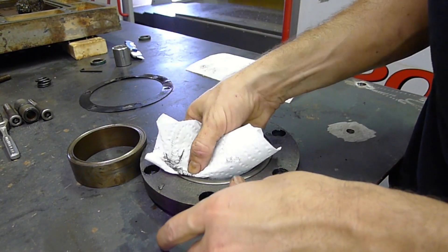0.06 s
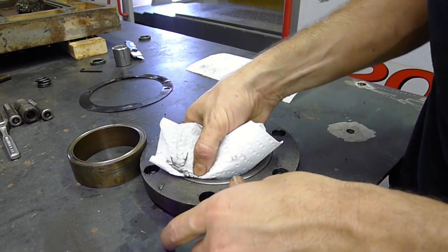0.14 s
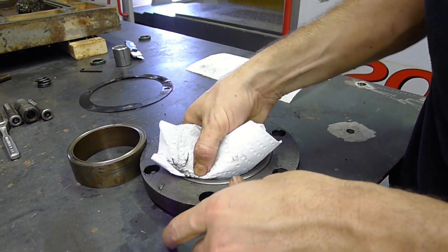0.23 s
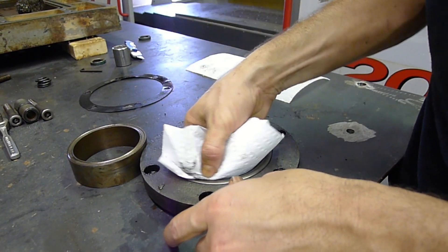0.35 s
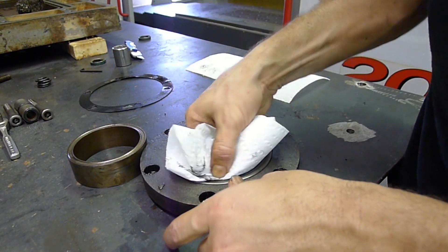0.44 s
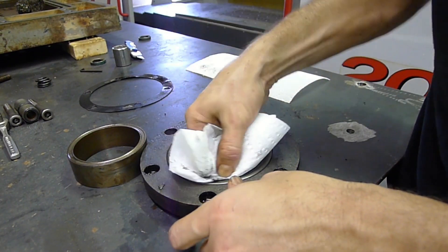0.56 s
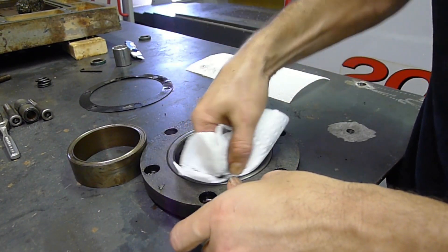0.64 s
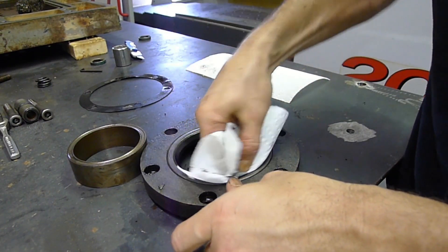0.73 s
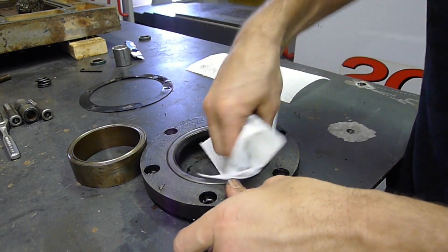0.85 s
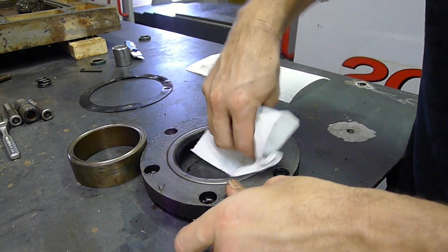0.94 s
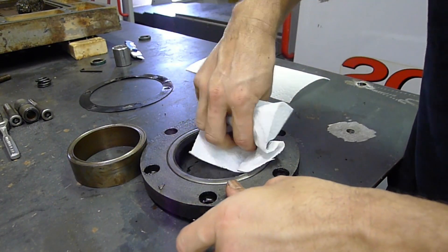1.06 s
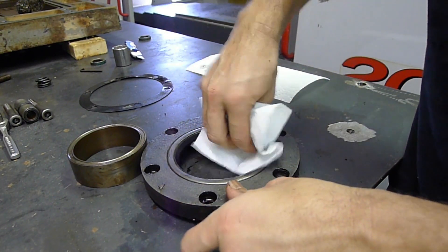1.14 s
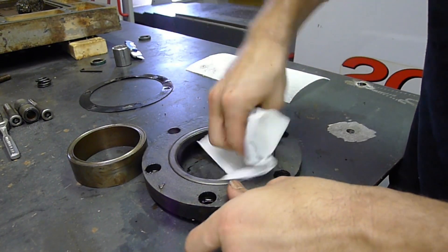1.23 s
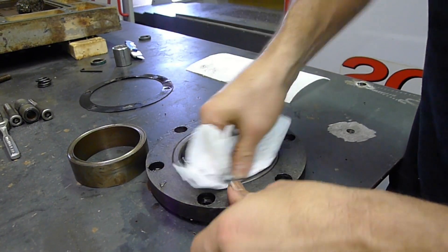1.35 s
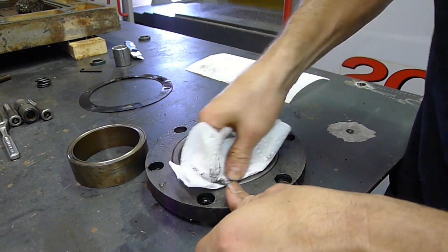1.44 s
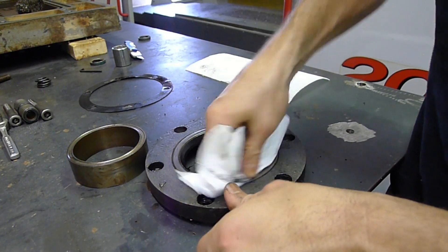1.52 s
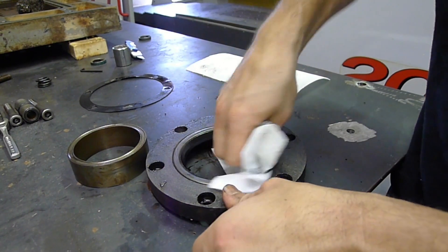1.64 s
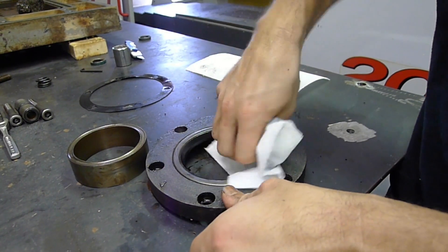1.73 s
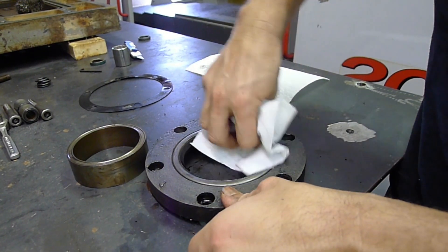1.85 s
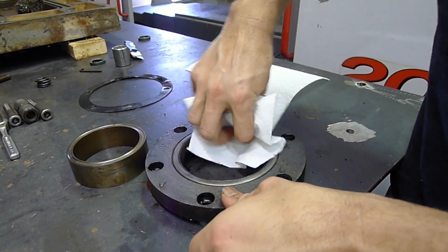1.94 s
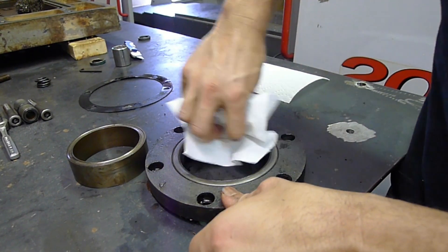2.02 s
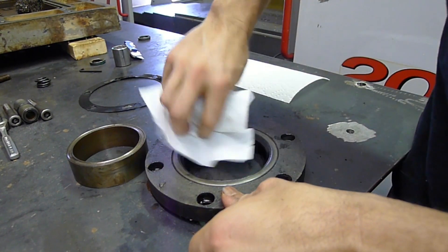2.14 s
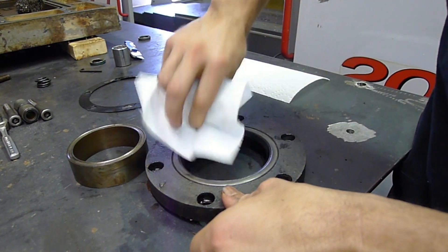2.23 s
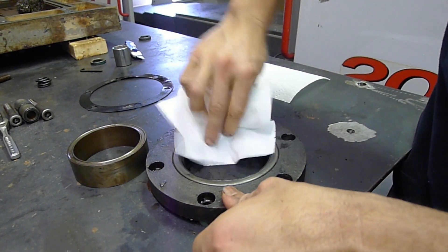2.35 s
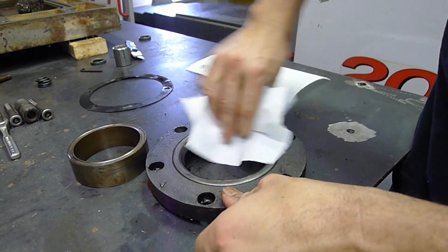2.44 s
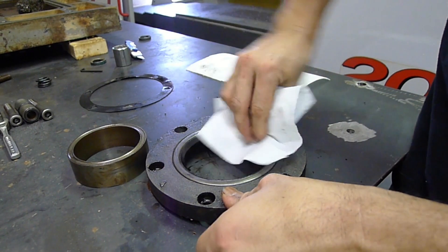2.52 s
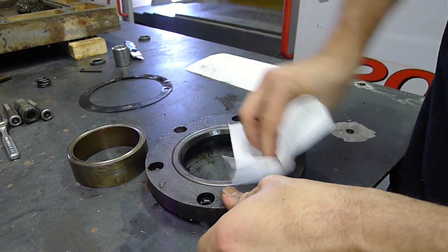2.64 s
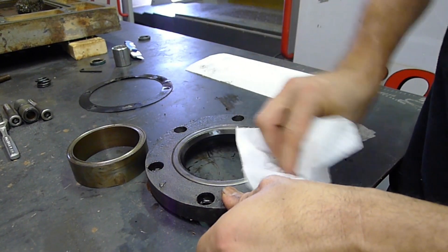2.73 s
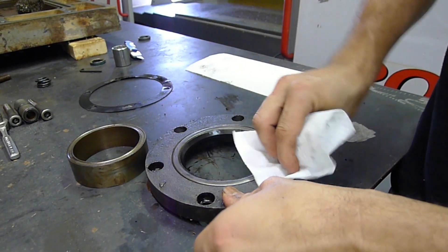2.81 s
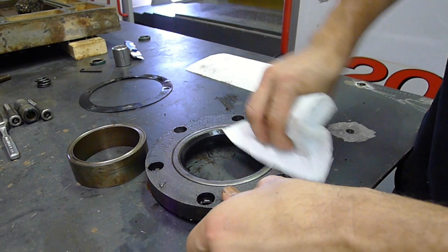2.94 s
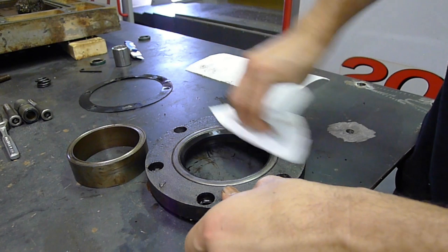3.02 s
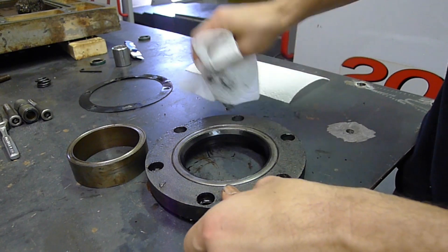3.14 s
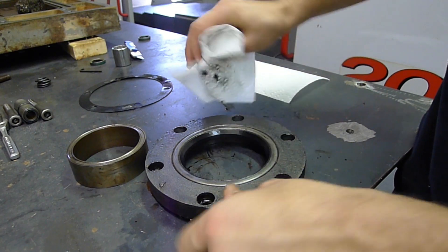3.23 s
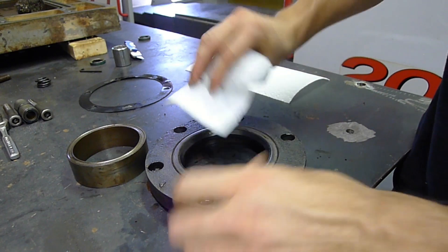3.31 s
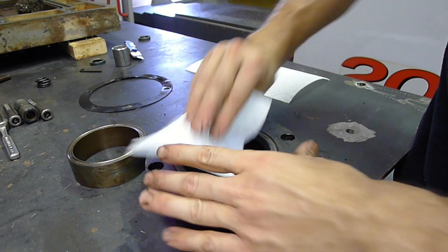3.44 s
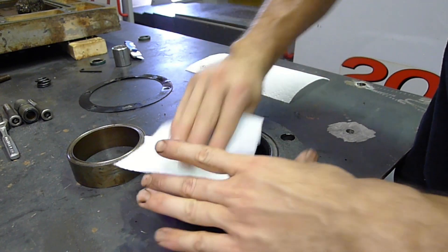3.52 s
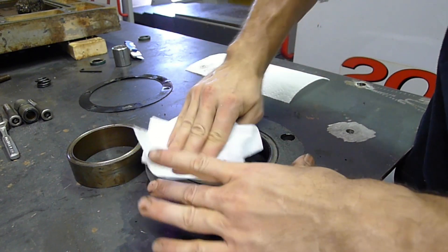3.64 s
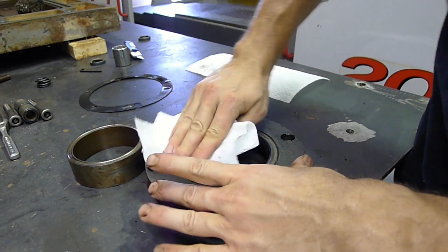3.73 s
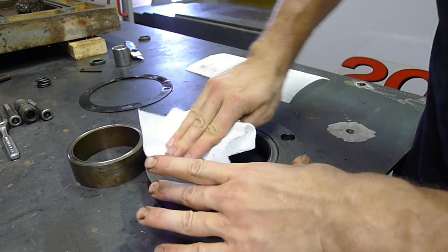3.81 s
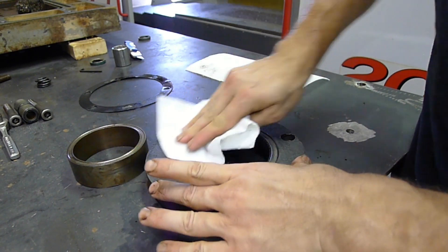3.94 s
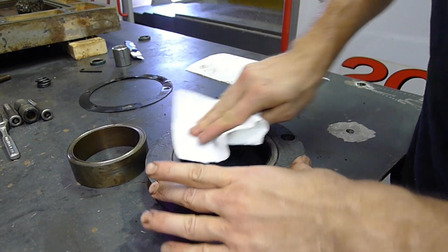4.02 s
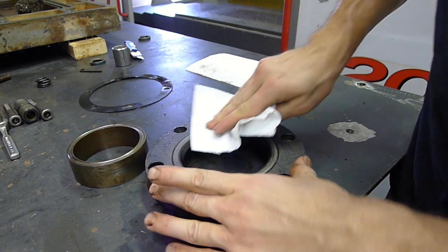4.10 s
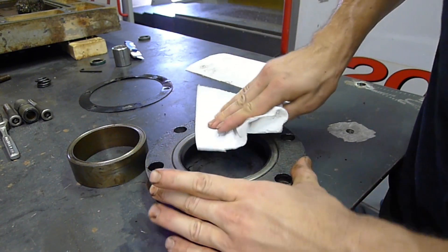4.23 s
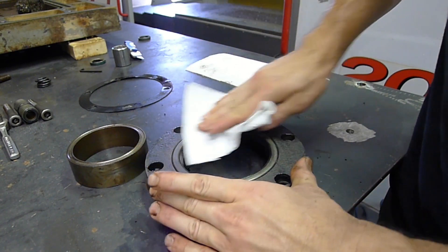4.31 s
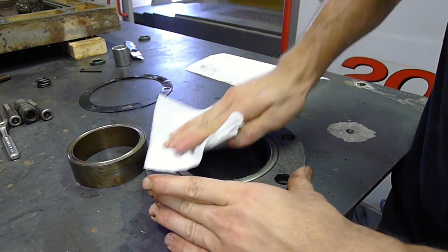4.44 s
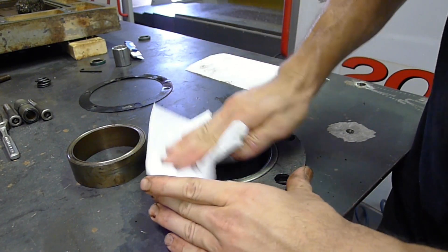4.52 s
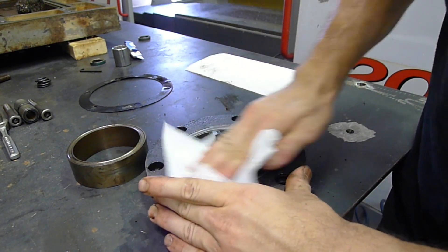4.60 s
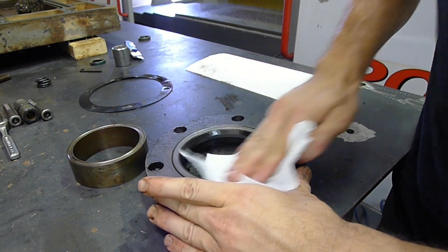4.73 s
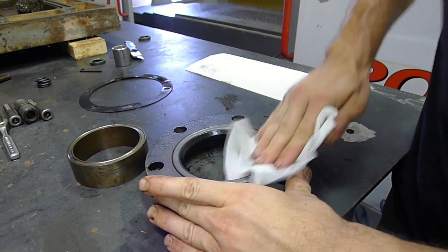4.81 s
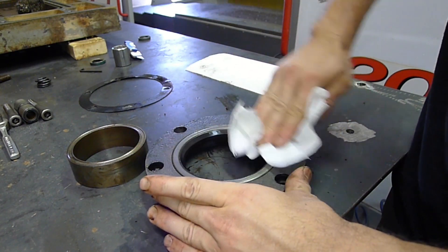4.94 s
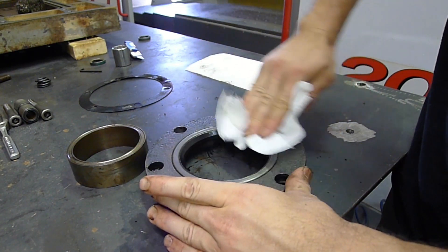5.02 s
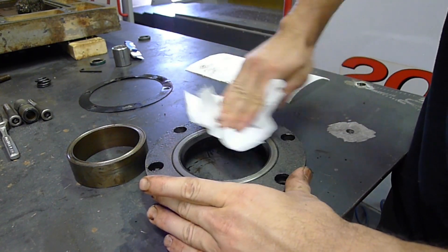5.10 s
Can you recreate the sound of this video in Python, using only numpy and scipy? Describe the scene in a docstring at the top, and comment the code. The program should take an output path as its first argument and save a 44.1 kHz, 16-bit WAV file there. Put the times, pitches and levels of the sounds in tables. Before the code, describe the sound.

Close, dry wiping of a paper towel on a steel ring, over a steady low-level workshop hiss with faint mains hum and rumble. From 0 to 0.5 s the rubs are soft and rustling; a small hard knock lands at 0.5 s, then longer swishes swell near 0.95 and 1.2 s. At about 1.26 s the flange skids, a very short rough metallic grind from the bench, followed by a dull thud at 1.35. Moderate strokes run to 2.17, then a near-pause with light papery ticks and taps until 2.36. The strongest, brightest strokes come at 2.45-2.75 and 2.8-3.08 s, with crisp snaps and a knock at 2.7. Wiping fades to a brief gap near 3.4; small taps follow. From 3.6 s smoother rubs rise and fall, dipping at 4.18, becoming fuller and hollow-toned after 4.6, with faint snaps, and still rubbing at the end, just past 5 s.

```python
"""Paper towel wiping a steel flange

A paper towel wipes a steel flange on a steel workbench, close to the microphone, in a quiet humming workshop.
Fibres catch and slip on the metal: clumped noise, coloured by the sheet, the ring and the hollow of the bore.
Folds knock on the rim and snap, the sheet ticks and the hand pushes the bench: short damped swings with noise.
Once the flange skids, and rough noise drives the modes of the bench top."""
import sys
import numpy as np
from scipy import signal
from scipy.fft import rfft, irfft, next_fast_len
from scipy.io import wavfile
from scipy.ndimage import uniform_filter1d, map_coordinates

SR = 44100
rng = np.random.default_rng(int(sys.argv[2]) if len(sys.argv) > 2 else 0)


def wrap_up_sound(samples):
    """Save the sound to the file named by the first command line argument, as 16-bit audio."""
    columns = np.atleast_2d(samples).T
    # keep every value between -1 and 1, then stretch to whole-number steps
    tamed = np.clip(columns, -1, 1)
    steps = np.round(tamed * 32767).astype(np.int16)
    wavfile.write(sys.argv[1], SR, steps)


N = 227850  # samples
HOP = 128  # samples between spectral frames

# Spectrum of the room noise. Each row: frequency in Hz, relative density in dB per Hz.
ROOM_SPECTRUM = [(24, -30), (45, -25), (461, -4), (722, -6), (1020, -7.5), (1280, -5), (2510, -8),
                 (2920, -16.5), (4800, -13.5), (15500, -26)]
# Partials of the mains hum. Each row: frequency in Hz, peak level in dB before wavering.
HUM_PARTIALS = [(119, -66), (238, -62.5)]
# Modes of the bench top. Each row: frequency in Hz, width in Hz, relative level in dB.
BENCH_MODES = [(277, 17, -2), (415.6, 12, 4.5), (467, 22, 2), (533, 11, -3), (670, 26, -7), (712, 15, 6),
               (810, 27, -14), (941, 12, 2.5), (1008, 12, -6), (1200, 25, -29), (1220, 9.4, -2)]
# The hand pushing the bench. Each row: start in seconds, level in dB before the swing and puff gains,
# pitch in Hz, time to decay by 60 dB in seconds.
BENCH_PUSHES = [(1.349, -42.5, 290, 0.26), (1.47, -53, 310, 0.072), (3.258, -43, 201, 0.095),
                (4.971, -47, 183, 0.1), (5.091, -33, 252, 0.034)]
# Folds knocking on the rim. Each row: start, level, pitch and decay time, as for the pushes.
RIM_KNOCKS = [(0.5068, -13.5, 930, 0.0069), (0.5094, -33, 1110, 0.012), (0.5072, -27, 480, 0.019),
              (2.192, -36.5, 513, 0.031), (2.346, -29, 1080, .015), (2.359, -29.5, 865, 0.02),
              (2.364, -29, 500, 0.0082), (2.7073, -11.5, 870, 0.004), (3.034, -28.5, 1200, 0.016),
              (3.054, -19.5, 580, 0.013), (3.278, -26.5, 509, 0.011), (3.457, -33, 1420, 0.019),
              (3.552, -29, 1080, 0.014), (3.563, -30, 795, 0.011)]
# The sheet ticking as it lifts or lands. Each row: start, level, pitch and decay time, as for the pushes.
SHEET_TICKS = [(0.0194, -31, 8000, .012), (0.5067, -43, 7000, 0.016), (2.1925, -22, 4200, 0.039),
               (2.2564, -33, 7000, .02), (2.347, -28, 7000, .015), (2.7685, -28, 4000, .014),
               (2.7774, -33, 6000, .014), (3.6147, -38, 7000, .012)]
# Folds snapping. Each row: start in seconds, level in dB before the swing and puff gains, pitch in Hz.
FOLD_SNAPS = [(0.507, -32, 2650), (0.6394, -33.5, 4040), (2.5642, -25.5, 4670), (2.6195, -21, 2460),
              (2.6384, -25, 4000), (2.6844, -24, 4440), (2.9405, -31, 4300), (2.9527, -18.5, 3260),
              (3.457, -35, 2670), (3.559, -26.5, 1940), (4.795, -29, 2800), (4.809, -26, 2710),
              (4.9255, -23.5, 3180)]
# Spectrum of paper fibres on steel. Each row: frequency in Hz, relative density in dB per Hz.
FIBRE_SPECTRUM = [(880, -15), (1500, -17), (2470, -7.5), (2920, -25), (3180, -11.5), (3760, -3), (6750, -3),
                  (7520, -3), (8460, -4), (15500, -12.5)]
# Modes of the rubbed ring. Each row: frequency in Hz, width in Hz, lift in dB at a ringing share of 1.
FLANGE_MODES = [(1970, 280, 3.5), (3270, 310, 3), (4270, 140, 2.5)]
# Pressure of the hand, one list per stroke. Each row: time in seconds, level of the swish in dB
# before the ring and the creases.
STROKE_PRESSURE = [
    [(0.0, -55), (0.006, -46.5), (0.138, -50.5), (0.152, -59), (0.202, -61), (0.212, -47), (0.218, -58),
     (0.26, -51.5)],
    [(0.26, -61), (0.266, -52), (0.292, -47.5), (0.328, -49), (0.418, -47), (0.466, -52), (0.47, -60),
     (0.5, -56)],
    [(0.51, -43), (0.562, -49), (0.618, -44.5), (0.698, -48), (0.94, -38), (1.05, -46), (1.074, -61),
     (1.09, -70)],
    [(1.09, -56), (1.106, -50.5), (1.134, -56), (1.15, -42.5), (1.18, -35), (1.298, -38), (1.384, -46),
     (1.43, -57)],
    [(1.43, -64), (1.432, -54), (1.47, -46), (1.512, -47.5), (1.58, -41.5), (1.718, -42.5), (1.782, -41),
     (1.95, -45.5)],
    [(1.95, -45), (2.028, -40), (2.098, -43), (2.172, -51.5), (2.18, -49)],
    [(2.21, -64), (2.248, -64), (2.256, -49), (2.266, -75), (2.31, -70), (2.32, -47.5), (2.335, -65)],
    [(2.34, -51), (2.354, -44), (2.418, -45), (2.458, -38.5), (2.644, -29.5), (2.702, -31), (2.742, -40),
     (2.77, -48)],
    [(2.77, -38), (2.79, -46.5), (2.844, -35.5), (2.912, -30), (3.034, -29.5), (3.068, -33), (3.094, -44.5),
     (3.11, -41)],
    [(3.11, -45), (3.132, -46.5), (3.146, -40.5), (3.174, -46.5), (3.186, -43.5), (3.32, -52.5),
     (3.328, -53), (3.39, -73)],
    [(3.39, -64), (3.414, -56), (3.418, -53.5), (3.472, -42.5), (3.508, -51.5), (3.558, -43), (3.585, -50)],
    [(3.585, -52), (3.619, -40), (3.815, -42.5), (3.971, -36.5), (4.123, -42.5), (4.159, -45.5),
     (4.169, -51), (4.19, -59)],
    [(4.19, -64), (4.21, -56), (4.216, -50), (4.262, -50), (4.288, -43), (4.372, -37), (4.536, -37),
     (4.57, -42.5)],
    [(4.57, -42), (4.582, -39), (4.688, -38.5), (4.814, -34), (4.852, -36), (5.13, -38), (5.166, -35)],
]
# How the towel cups the bore. Each row: time in seconds, hollow level in dB at usual pressure,
# hollow pitch in Hz, treble in dB over the swish at usual pressure.
BORE_CUPPING = [(0.05, -24, 990, -2), (0.35, -23, 1076, 0.5), (0.6, -24, 1030, -7), (0.8, -29.5, 1150, 1),
                (0.93, -38.5, 990, -2), (1.05, -29, 990, 5), (1.18, -28, 1000, -4.5), (1.31, -18, 960, -4),
                (1.45, -25.5, 1000, 5.5), (1.65, -31.5, 950, -0.5), (1.8, -35, 970, 2.5),
                (2.04, -27.5, 1050, -2), (2.15, -42.5, 1100, 5), (2.28, -26, 1020, 4),
                (2.36, -27.5, 980, 0), (2.48, -29.5, 1070, -4.5), (2.6, -34, 1180, -9),
                (2.72, -35.5, 1080, -16), (2.9, -32.5, 970, -9.5), (3.05, -28, 990, -5.5),
                (3.25, -31.5, 940, -2), (3.39, -26.5, 1070, 8), (3.47, -26, 1080, -3),
                (3.56, -27.5, 1040, -4), (3.65, -29, 920, 1), (3.98, -31.5, 1030, -4),
                (4.35, -34, 1030, 0.5), (4.44, -32, 990, -4), (4.56, -29, 900, -2), (4.66, -27, 1210, -4),
                (4.76, -21, 1180, -4.5), (4.9, -27, 1160, -5), (4.98, -24.5, 900, -2),
                (5.09, -28, 980, -4.5), (5.16, -35.5, 1020, -5)]
# How freely flange and hollow ring. Each row: time in seconds, share of the flange's mode lift,
# width of the hollow's resonance in Hz at usual pressure.
RINGING_FREEDOM = [(0, 1.8, 420), (.65, 1.1, 380), (.87, 1.3, 432), (1.05, 0.61, 500), (1.3, 1.6, 694),
                   (1.6, 0.6, 480), (2.1, 0.88, 620), (2.6, 0.57, 554), (4.0, 0.54, 513), (4.5, .7, 300),
                   (4.75, 0.44, 650), (5.16, .6, 580)]
# How the fingers hold the sheet. Each row: time in seconds, fold level in dB and finger pad level in dB
# (both at usual pressure and cupping), fold pitch in Hz.
FINGER_GRIP = [(0, -32.5, -40, 2740), (.45, -34, -37.5, 2530), (.8, -32.5, -36, 2930),
               (.98, -35, -36, 2800), (1.065, -26.5, -36, 2700), (1.1, -34.5, -29, 2600),
               (1.18, -31, -41, 2770), (1.35, -33, -28, 2400), (1.65, -32, -45, 3040),
               (1.95, -34.5, -47, 2900), (2.15, -33, -23, 2870), (2.28, -30.5, -29, 2600),
               (2.36, -29, -27, 2450), (2.48, -31, -45, 3070), (2.7, -29, -28.5, 2380),
               (2.9, -29, -33, 2800), (3.06, -34, -33.5, 2900), (3.25, -30, -29.5, 2880),
               (3.52, -33, -32, 2450), (3.66, -33.5, -34.5, 2620), (3.98, -34.5, -31.5, 2500),
               (4.35, -33.5, -28, 2930), (4.5, -35, -36.5, 2440), (4.63, -33, -43, 2120),
               (4.74, -33.5, -41, 2600), (4.81, -28.5, -38, 2840), (4.9, -31, -38.5, 2900),
               (5.16, -32.5, -30.5, 2700)]
# Narrow dip of the microphone path, as one row: centre in Hz, width in Hz.
MICROPHONE_DIP = (7460, 510)

ROOM_DB, ROOM_WAVER_DB = -50, 0.6  # rms level and its waver
HUM_WAVER_DB = 2.5
RUMBLE_DB, RUMBLE_WAVER_DB = -64, 3
SKID_S, SKID_DB = 1.263, -35  # the flange drags on the bench: centre of the loudest moment
SKID_HOLD_S, SKID_RISE_DB_PER_S, SKID_FALL_DB_PER_S = 0.066, 282, 220
SKID_TAIL_DB, SKID_TAIL_DB_PER_S = -41, 56  # it grinds on faintly before it stops
SNAP_T60_S = 0.011
USUAL_SWISH_DB, USUAL_CUP_DB = -40, -30
BODY_FOLLOWS = 0.54  # dB of hollow, fold and pad per dB of pressure
TREBLE_FOLLOWS = 0.45  # extra dB of treble per dB of pressure
FOLD_CUPS, PAD_CUPS = 0.18, 0.89  # dB of fold and of pad per dB of cupping
WIDENS = 0.07  # the hollow's resonance grows this many dB wider per dB of pressure
BASS_CORNER_HZ, TOP_HZ = 153, 15730


def amp(db):
    """The decibel law: 20 dB is a factor of ten in amplitude."""
    return 10 ** (np.asarray(db) / 20)


def unit(x):
    """Normalisation to a root mean square of 1."""
    return x / np.sqrt(np.mean(np.abs(x) ** 2) + 1e-20)


def along(points, hz):
    """Interpolation of (Hz, value) points on a logarithmic frequency axis."""
    f, v = np.transpose(points)
    return np.interp(np.log(hz + 1), np.log(f + 1), v)


def curves(rows, t):
    """Linear interpolation at times t of each column after the time."""
    s, *cols = np.transpose(rows)
    return [np.interp(t, s, c) for c in cols]


def wobble(rate):
    """Band-limited random motion: a smooth curve through `rate` random knots a second."""
    knots = rng.standard_normal(int(N * rate / SR) + 4)
    return map_coordinates(knots, [np.arange(N) * rate / SR])


def filtered(x, response):
    """Linear filtering: the spectrum of x times a complex response of frequency."""
    m = next_fast_len(N + SR // 2)
    hz = np.fft.rfftfreq(m, 1 / SR)
    return irfft(rfft(x, m) * response(hz), m)[..., :N]


def resonance(hz, centre_hz, width_hz):
    """Damped oscillator: the response of one mode, with gain 1 at its centre."""
    damping = 1j * hz * width_hz
    return damping / (centre_hz ** 2 - hz ** 2 + damping + 1e-9)


def slips(clump_db, spike_db):
    """Stick-slip friction: dense noise whose size comes in clumps, with a few larger catches."""
    clumps = clump_db * (wobble(60) + wobble(400))
    catches = spike_db * rng.exponential(size=N)
    return unit(amp(clumps + catches) * rng.standard_normal(N))


def taps(rows, swing, puff):
    """Impulsive excitation: each tap is a short damped swing with a puff of noise of like colour."""
    out = np.zeros(N + SR)
    t = np.arange(SR // 5) / SR
    for s, db, hz, t60 in rows:
        b, a = signal.butter(1, [0.5 * hz, 1.8 * hz], "band", fs=SR)
        noise = unit(signal.lfilter(b, a, rng.standard_normal(len(t))))
        onset = 1 - np.exp(-t * hz * 0.71)
        shape = amp(db - 60 * t / max(t60, 0.002)) * onset
        out[round(s * SR):][:len(t)] += shape * (puff * noise - swing * np.sin(2 * np.pi * hz * t))
    return out[:N]


def workshop():
    """Stationary ambience: shaped room noise, a wavering mains hum and a low rumble that comes and goes."""
    t = np.arange(N) / SR
    air = unit(filtered(rng.standard_normal(N), lambda hz: amp(along(ROOM_SPECTRUM, hz))))
    air = amp(ROOM_DB + ROOM_WAVER_DB * wobble(3.23)) * air
    hum = np.zeros(N)
    for hz, db in HUM_PARTIALS:
        phase = 2 * np.pi * hz * t + 0.46 * wobble(3.98)
        hum += amp(db + 0.62 * wobble(3.9)) * np.sin(phase)
    hum = amp(HUM_WAVER_DB * wobble(3.7)) * hum
    rumble = unit(filtered(rng.standard_normal(N), lambda hz: resonance(hz, 189, 106) ** 2))
    rumble = amp(RUMBLE_DB + RUMBLE_WAVER_DB * wobble(4.06)) * rumble
    return air + hum + rumble


def bench_pushes():
    """Low damped vibration: the hand pushes the bench, which gives dull thuds."""
    return taps(BENCH_PUSHES, swing=1.86, puff=0.68)


def bench_response(hz):
    """Modal superposition: the resonances of the bench top add with alternating sign."""
    return sum((-1) ** k * amp(db) * resonance(hz, centre, width)
               for k, (centre, width, db) in enumerate(BENCH_MODES))


def skid():
    """Friction-driven vibration: rough steel on steel drives the modes of the bench top."""
    t = np.arange(N) / SR - SKID_S
    before = np.maximum(-t - SKID_HOLD_S / 2, 0)
    after = np.maximum(t - SKID_HOLD_S / 2, 0)
    main = amp(SKID_DB - SKID_FALL_DB_PER_S * after)
    tail = amp(SKID_TAIL_DB - SKID_TAIL_DB_PER_S * after)
    rise = amp(-SKID_RISE_DB_PER_S * before)
    grind = unit(filtered(slips(clump_db=2.0, spike_db=3.0), bench_response))
    return (main + tail) * rise * grind


def fold_taps():
    """Brief impacts of paper: folds knock and snap mostly as tones, the lifting sheet ticks mostly as noise."""
    knocks = taps(RIM_KNOCKS, swing=2.27, puff=0.16)
    snaps = taps([(*row, SNAP_T60_S) for row in FOLD_SNAPS], swing=1.42, puff=0.45)
    ticks = taps(SHEET_TICKS, swing=0.1, puff=0.23)
    return knocks + snaps + ticks


def towel():
    """Source and filter: fibre slips coloured moment by moment by the crumpled sheet, ring and hollow."""
    friction = slips(clump_db=0.37, spike_db=1.0)
    hz, t, z = signal.stft(friction, SR, nperseg=4 * HOP, noverlap=3 * HOP)
    f = hz[:, None]
    swish_db, = curves(np.vstack(STROKE_PRESSURE), t)
    cup_db, hollow_hz, treble_db = curves(BORE_CUPPING, t)
    fold_db, pad_db, fold_hz = curves(FINGER_GRIP, t)
    freedom, width_hz = curves(RINGING_FREEDOM, t)

    press = swish_db - USUAL_SWISH_DB
    cup = cup_db - USUAL_CUP_DB
    body_db = BODY_FOLLOWS * press
    width_hz = width_hz * amp(WIDENS * press)

    # harder strokes are brighter: the treble change grows from 6 kHz up
    bright = np.clip(np.log2((f + 1) / 6000) / 1.2, 0, 1)
    treble_change_db = bright * (treble_db + TREBLE_FOLLOWS * press)
    swish = unit(amp(along(FIBRE_SPECTRUM, f))) * 1.0
    swish = swish * amp(swish_db + treble_change_db)
    fold = amp(2 * (fold_db + FOLD_CUPS * cup + body_db)) * np.abs(resonance(f, fold_hz, 2800)) ** 4
    hollow = amp(2 * (cup_db + body_db)) * np.abs(resonance(f, hollow_hz, width_hz)) ** 4
    hollow = hollow * 500 / width_hz  # a wider resonance peaks lower
    pad = amp(2 * (pad_db + PAD_CUPS * cup + body_db)) * np.abs(resonance(f, 494, 540)) ** 4
    power = swish ** 2 + fold + hollow + pad

    lift_db = sum(db * np.abs(resonance(f, centre, width)) ** 2 for centre, width, db in FLANGE_MODES)
    ring = amp(freedom * lift_db)
    # creases come and go, each favouring a patch of frequencies for a moment
    creases = uniform_filter1d(rng.standard_normal(z.shape), size=8, axis=0)
    creases = uniform_filter1d(creases, size=10, axis=1)
    gain = np.sqrt(power) * ring * amp(1.34 * unit(creases))
    return signal.istft(z * gain, SR, nperseg=4 * HOP, noverlap=3 * HOP)[1][:N]


def scene():
    """Superposition: the pressures of all sources add at one microphone, heard alike in both channels."""
    mono = workshop() + bench_pushes() + skid() + fold_taps() + towel()
    return np.array([mono, mono])


def record(dry):
    """Transfer function of the microphone path: thin bass, a narrow treble dip, then the band limit."""
    def response(f):
        bass = (1j * f / (BASS_CORNER_HZ + 1j * f)) ** 2
        dip = 1 - 1.4 * resonance(f, *MICROPHONE_DIP)
        return bass * dip * (f < TOP_HZ)
    return filtered(dry, response)


dry = scene()
out = record(dry)
wrap_up_sound(out)
```